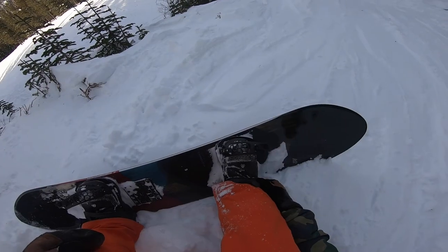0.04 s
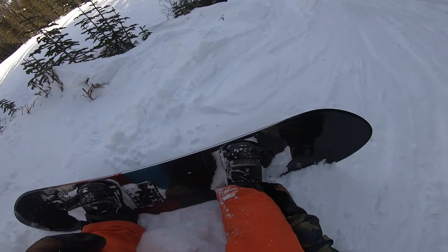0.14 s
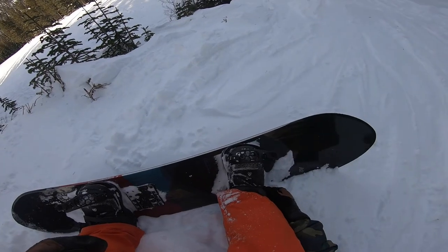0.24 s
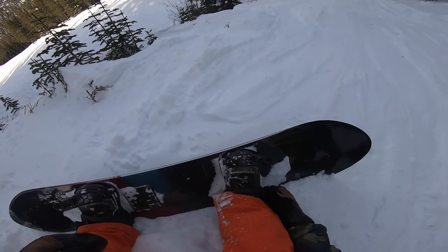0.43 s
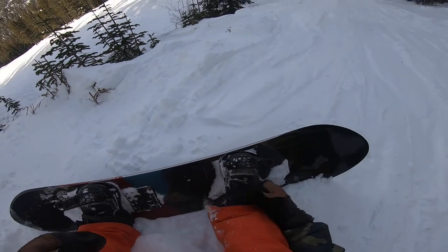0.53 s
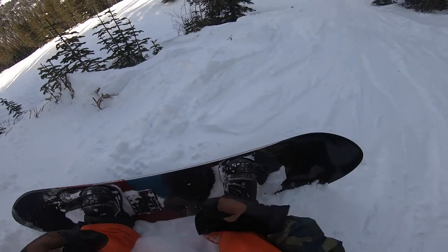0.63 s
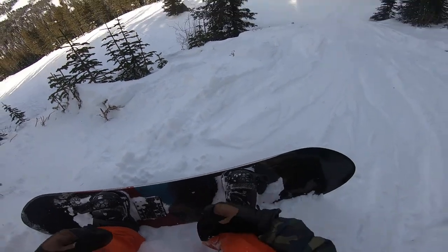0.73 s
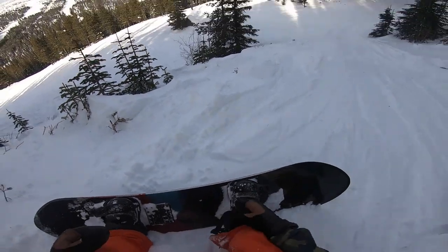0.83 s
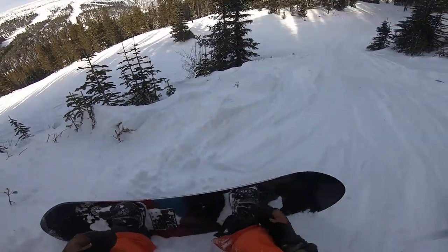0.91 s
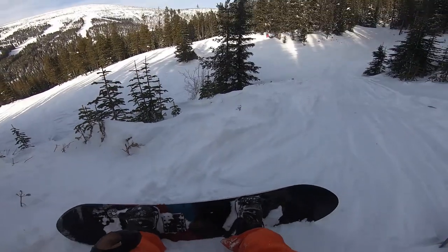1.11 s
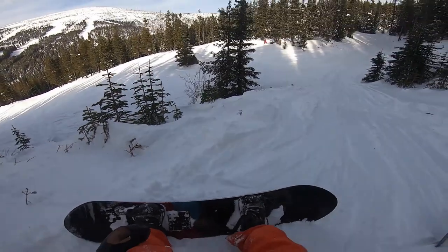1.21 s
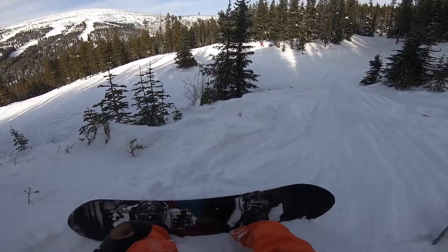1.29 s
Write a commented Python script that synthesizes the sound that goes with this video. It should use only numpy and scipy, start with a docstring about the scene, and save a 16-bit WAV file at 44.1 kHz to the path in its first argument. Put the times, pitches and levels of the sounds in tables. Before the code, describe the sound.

A snowboard binding buckle knocks and ratchets tight, with a jacket rustling close by.

```python
"""On open snow, a body-worn camera's microphone an arm's length from a snowboard binding. The seated rider
tightens it: the buckle knocks home, the pawl snaps along the ladder strap and loose parts tick. Right at the
microphone a padded jacket rubs and bumps, its zip creaks as it sticks and slips, a nylon sleeve swishes and air
puffs lightly. A light hiss of clothing and snow swells and lulls to the right; there is no echo."""
import sys
import numpy as np
from scipy.fft import rfft, irfft, next_fast_len
from scipy.io import wavfile
from scipy.ndimage import map_coordinates

SR = 44100
rng = np.random.default_rng(int(sys.argv[2]) if len(sys.argv) > 2 else 0)


def dump_mix(stems):
    """Bounce the given channels to the path in sys.argv[1] as a 16-bit WAV at rate SR."""
    frames = np.atleast_2d(stems).T  # one column per channel
    limited = np.clip(frames, -1, 1)  # hard clip at full scale
    pcm = np.round(limited * 32767).astype(np.int16)
    wavfile.write(sys.argv[1], SR, pcm)


N = 59535
SIDE = np.array([[.5], [-.5]])  # splits a left-minus-right amount between the channels


def amp(db):
    """Decibels to gain."""
    return 10 ** (np.asarray(db) / 20)


def along(points, hz):
    """Read (Hz, value) points on a log frequency axis."""
    freqs, values = np.transpose(points)
    return np.interp(np.log(hz + 1), np.log(freqs + 1), values)


def curve(points):
    """Join (seconds, value) points into one value per sample."""
    return np.interp(np.arange(N) / SR, *np.transpose(points))


def wobble(rate):
    """A smooth random curve, rate knots a second."""
    return map_coordinates(rng.standard_normal(4096), [np.arange(N) * rate / SR], mode="wrap")


def filtered(x, response):
    """Filter x by a complex response of frequency."""
    size = next_fast_len(N + SR // 2)
    return irfft(rfft(x, size) * response(np.fft.rfftfreq(size, 1 / SR)), size)[..., :N]


# Sound close to the microphone. Each row: frequency in Hz, left-right correlation.
NEAR_LIKENESS = [(300, 0.99), (1200, 0.76), (3500, 1), (6000, 0.39), (8000, 0.2)]
def noise(colour, likeness=NEAR_LIKENESS):
    """Coloured stereo noise of rms 1, with the given left-right likeness."""
    def mid_and_side(hz):
        angle = np.arccos(np.clip(along(likeness, hz), -1, 1)) / 2
        return amp(along(colour, hz)) * np.array([np.cos(angle), np.sin(angle)])
    mid, side = filtered(rng.standard_normal((2, N)), mid_and_side)
    stereo = np.array([mid + side, mid - side])
    return stereo / np.sqrt(np.mean(stereo ** 2) + 1e-20)


def since(start):
    """Seconds since a moment, zero before it."""
    return np.maximum(np.arange(N) / SR - start, 0)


def burst(start, rise, t60):
    """Envelope of one contact: a quick rise, then a decay."""
    t = since(start)
    return np.minimum(t / rise, 1) ** 2 * amp(-60 * np.maximum(t - rise, 0) / t60)


def ring(start, modes, scatter_db, detune):
    """Struck, damped modes of alternating sign; level and pitch vary from blow to blow."""
    t, out = since(start), np.zeros(N)
    live = (t > 0) & (t < .15)
    for k, (hz, db, t60) in enumerate(modes):
        level_draw, pitch_draw = rng.standard_normal(2)
        cycles = hz * (1 + detune * pitch_draw) * t[live]
        swell = 1 - np.exp(-cycles / 0.91)
        decay = amp(db + scatter_db * level_draw - 60 * t[live] / t60)
        out[live] += (-1) ** k * swell * decay * np.sin(2 * np.pi * cycles)
    return out


# The buckle hits home. Each row: start in seconds, boom level in dB, crack level in dB.
BUCKLE_KNOCKS = [(0.2737, -4, -25), (0.2754, -27, -22)]
# Boot, binding and board. Each row: frequency in Hz, level in dB, 60 dB decay time in seconds.
BINDING_MODES = [(85, -9.5, 0.09), (183.6, -7.5, 0.079), (300.3, -0.5, 0.052), (413, -17, 0.03),
                 (510, -3.5, 0.016), (723, -16, 0.033), (1110, -12, 0.031), (1665, -14, 0.023),
                 (2310, -4.5, 0.0038), (3060, -6, 0.0064)]
# The snap of buckle and teeth. Each row: frequency in Hz, relative level in dB.
SNAP_COLOUR = [(180, -22), (400, -0.5), (730, -4.5), (1000, -3.5), (1900, -8), (2800, -3.5), (4800, -10),
               (5400, -18), (7000, -8.5), (9300, -19.5), (10500, -42), (15000, -36)]
def buckle_knock():
    """An arm's length away, the buckle cracks against the binding, which booms with the board."""
    boom = sum(amp(db) * ring(s, BINDING_MODES, scatter_db=0.8, detune=0.004)
               for s, db, _ in BUCKLE_KNOCKS)
    crack = sum(amp(db) * burst(s, rise=0.000097, t60=0.02) for s, _, db in BUCKLE_KNOCKS)
    return boom + crack * noise(SNAP_COLOUR)


# Ladder teeth passing the pawl. Each row: start in seconds, relative level in dB.
LADDER_TEETH = [(0.3134, -17), (0.3199, -17.5), (0.3402, -21.5), (0.357, -24), (.377, -23), (0.3896, -19.5),
                (0.3938, -15.5), (0.4022, -17), (.412, -19), (0.4254, -14.5), (0.4328, -9), (0.4405, -11.5),
                (0.4486, -11), (.4548, -15), (0.4606, -14), (.4678, -11), (.4727, -11.5), (0.477, -19.5)]
# Pawl and taut strap. Each row: frequency in Hz, level in dB, 60 dB decay time in seconds.
PAWL_MODES = [(5420, -1, 0.011), (6330, 0, 0.0079)]
STRAP_MODES = [(140, 4, 0.056), (252.6, 0.5, 0.052), (395, -13, 0.026), (740.5, -6, 0.06)]
def ratchet():
    """Each tooth snaps under the pawl, rings it and plucks the strap."""
    rise_s = 0.001713
    pawl_growth = 2.18  # hard snaps ring the pawl far more than light ones
    snaps = sum(amp(db - 8) * burst(s, rise_s, t60=0.011) for s, db in LADDER_TEETH)
    pawl = sum(amp(pawl_growth * db + 1) * ring(s + rise_s / 2, PAWL_MODES, scatter_db=-2.5, detune=.016)
               for s, db in LADDER_TEETH)
    thuds = sum(amp(db - 12) * ring(s + rise_s, STRAP_MODES, scatter_db=1, detune=0.046)
                for s, db in LADDER_TEETH)
    return snaps * noise(SNAP_COLOUR) + pawl + thuds


# Loose buckle parts. Each row: start in seconds, relative level in dB, clack offset in dB.
PART_TICKS = [(.2751, -13, -14), (.8145, -21, 12), (.8278, -28, -14), (.8422, -34, -12), (.853, -36, -2),
              (.858, -34, -14), (.916, -16.5, -12), (.9245, -21.5, -2), (1.0555, -38, 18)]
# Their metal. Each row: frequency in Hz, level in dB, 60 dB decay time in seconds.
METAL_MODES = [(1680, -4, 0.0067), (2600, -2, 0.0065), (5760, 0, 0.006), (6700, 0, 0.005),
               (7690, 5, 0.0055), (12100, -25, 0.007)]
# The plastic they hit. Each row: frequency in Hz, relative level in dB.
PLASTIC_COLOUR = [(150, -2), (500, 3.5), (900, 5), (1900, -3), (3600, -3.5), (7500, -10), (11000, -28),
                  (16000, -55)]
def buckle_ticks():
    """Right of the microphone, small metal parts ring briefly and clack on plastic."""
    metal = sum(amp(db - 6.5) * ring(s + 0.000447, METAL_MODES, scatter_db=1, detune=0.013)
                for s, db, _ in PART_TICKS)
    clack = sum(amp(db + clack_db - 12.5) * burst(s, rise=0.00094, t60=0.0096)
                for s, db, clack_db in PART_TICKS)
    return (metal + clack * noise(PLASTIC_COLOUR)) * amp([[-2.5], [1.5]])


# Zip creaks. Each row: start and length in seconds, first and last slip rate in Hz, level in dB.
ZIP_CREAKS = [(0.127, 0.034, 195.4, 166, -36), (.2, 0.069, 333.5, 289, -34.5),
              (0.477, 0.0444, 216.7, 226.5, -29.5), (0.517, 0.033, 242, 356, -32.5),
              (.799, .018, 487, 503, -33)]
def zip_creak():
    """A zip rubbing in the cloth sticks and slips at a gliding, unsteady rate."""
    jitter, octave_fall_db, fade_s = 0.047, -12, 0.011
    out = np.zeros(N)
    for start, length, first_hz, last_hz, db in ZIP_CREAKS:
        t = since(start)
        slip_hz = np.interp(t, [0, length], [first_hz, last_hz]) * (1 + jitter * wobble(250))
        phase = 2 * np.pi * np.cumsum(slip_hz * (t > 0)) / SR
        tone = sum(amp(octave_fall_db * np.log2(k)) * np.sin(k * phase) for k in range(1, 6))
        fade = np.clip(np.minimum(t, length - t) / fade_s, 0, 1)
        out += np.sqrt(2) * tone * amp(db + 0.45 * wobble(200)) * fade
    return out


# Cloth rubbing. Each row: time in seconds, level in dB.
RUB_LEVELS = [(0, -53.5), (.18, -53), (.225, -33.5), (.3, -32.5), (.38, -44), (.45, -30), (.5, -35.5),
              (.555, -44), (.69, -56), (.76, -48), (.92, -48), (.97, -42.5), (1.025, -52), (1.1, -47.5),
              (1.21, -37), (1.255, -43.5), (1.3, -38)]
# Soft bumps. Each row: start in seconds, relative level in dB, scuff offset in dB.
JACKET_BUMPS = [(0.248, -15.5, -15), (0.315, -15.5, -23), (.333, -19, -23), (.362, -24.5, -17),
                (0.814, -29.5, -1), (0.851, -43, 7.5), (.883, -43.5, 12), (0.94, -22, -35),
                (.957, -16, -39), (0.98, -30, 3.5), (1.0545, -41, 8), (1.087, -30.5, -8), (1.194, -26, 0.5),
                (1.285, -31, -2), (1.303, -22.5, -13), (1.344, -27, -4)]
# Camera mount and padding. Each row: frequency in Hz, level in dB, 60 dB decay time in seconds.
PADDING_MODES = [(102, -6.5, 0.11), (195, 4.5, 0.058), (308.6, -2.5, 0.048), (447, -5, 0.048)]
# Dull cloth friction. Each row: frequency in Hz, relative level in dB.
RUB_COLOUR = [(25, -36), (70, -13.5), (130, 1.5), (200, 1.5), (330, 0), (550, -7), (1200, -22), (2500, -25),
              (6000, -38), (12000, -78)]
SCUFF_COLOUR = [(150, -2), (500, 8.5), (1200, -3.5), (2500, -17.5), (6000, -61), (15000, -67)]
def jacket():
    """Right at the microphone, padded cloth rubs and bumps the camera, each bump with a scuff."""
    rub = amp(curve(RUB_LEVELS) + 2 * wobble(90.14)) * noise(RUB_COLOUR)
    bumps = sum(amp(db - 3.5) * ring(s, PADDING_MODES, scatter_db=0.8, detune=0.05)
                for s, db, _ in JACKET_BUMPS)
    scuffs = sum(amp(db + scuff_db - 1) * burst(s, rise=0.002, t60=0.03)
                 for s, db, scuff_db in JACKET_BUMPS)
    return rub + bumps + scuffs * noise(SCUFF_COLOUR)


# The sliding sleeve. Each row: time in seconds, level in dB.
SWISH_LEVELS = [(.18, -63.5), (.24, -55), (.308, -57), (.326, -40.5), (.37, -54), (.41, -40), (.47, -34.5),
                (.5, -36), (.565, -38.5), (.61, -39), (.675, -45.5), (.712, -63), (.78, -42.5), (.825, -45),
                (.89, -58.5), (1.02, -75), (1.33, -51)]
# Light skims. Each row: middle and half width in seconds, level in dB.
NYLON_SKIMS = [(0.636, 0.052, -45), (1.055, 0.012, -50), (1.09, 0.014, -49.5)]
# Bright nylon friction. Each row: frequency in Hz, relative level in dB.
SWISH_COLOUR = [(180, -36), (500, -7.5), (900, -9), (1100, -1), (1800, -7), (2400, -1.5), (4800, -8.5),
                (7300, -7), (9300, -17), (10500, -32.5), (15000, -28.5)]
SKIM_COLOUR = [(1000, -28), (5500, -8), (7700, 1), (10200, -19), (15000, -31)]
def sleeve():
    """Close by, nylon slides with a fine, uneven grain and hisses brightly where it skims."""
    grain = amp(1.4 * wobble(600) + 0.8 * wobble(45.1))
    swish = amp(curve(SWISH_LEVELS)) * noise(SWISH_COLOUR)
    skims = sum(amp(db) * np.exp(-((since(0) - s) / width) ** 2) for s, width, db in NYLON_SKIMS)
    return grain * (swish + skims * noise(SKIM_COLOUR))


# The hiss of clothing and snow. Each row: time in seconds, level in dB.
HISS_LEVELS = [(0, -51), (.17, -50), (.68, -53), (.714, -55), (.76, -52.5), (.92, -43), (.975, -48),
               (1.06, -46)]
# Its width. Each row: frequency in Hz, left-right correlation.
HISS_LIKENESS = [(200, 0.5), (1500, 0.53), (7000, 0.17), (12000, 0.15)]
# Air on the microphone. Each row: start in seconds, level in dB, 60 dB decay time in seconds.
MIC_PUFFS = [(0.278, -45, 0.45), (.33, -40, 0.22), (.45, -40.5, 0.61), (.8, -42.5, 0.34),
             (0.873, -45, 0.15)]
# The hiss and the low buffeting. Each row: frequency in Hz, relative level in dB.
HISS_COLOUR = [(59, -16), (130, 5), (250, -3.5), (850, 3), (1700, 1), (5500, -14.5), (7400, -4),
               (9600, -21), (15000, -51)]
BUFFET_COLOUR = [(25, -5.5), (70, -9.5), (110, -33), (1500, -75)]
def hiss_and_puffs():
    """A light hiss of clothing and snow swells and lulls to the right; air puffs on the microphone."""
    hiss_pan_db, puff_pan_db, left_lag_s, floor_db = -8, -4, 0.000305, -61
    hiss = noise(HISS_COLOUR, HISS_LIKENESS)
    hiss = filtered(hiss, lambda hz: np.exp(-2j * np.pi * hz * left_lag_s * SIDE))
    hiss *= amp(curve(HISS_LEVELS) + hiss_pan_db * SIDE)
    puffs = amp(floor_db) + sum(amp(db) * burst(s, rise=0.01, t60=t60) for s, db, t60 in MIC_PUFFS)
    buffet = noise(BUFFET_COLOUR, likeness=[(30, 0.18), (90, 0.56)])
    return hiss + puffs * amp(puff_pan_db * SIDE) * buffet


# The gear's balance at the microphone. Each row: frequency in Hz, left minus right in dB.
GEAR_PAN = [(200, 0.5), (500, -2), (1200, -6), (2500, -4.5), (5500, -1), (8000, -7), (12000, -2)]
# Its phase there. Each row: frequency in Hz, lead of the left channel in radians.
GEAR_PHASE = [(500, 0), (1200, 0.87), (3500, -0.52), (6500, 0.9), (8500, 1.26)]
def scene():
    """The gear lies close by, slightly to the right, over a light hiss, with no echo from the snow."""
    def placement(hz):
        return amp(SIDE * along(GEAR_PAN, hz)) * np.exp(1j * SIDE * along(GEAR_PHASE, hz))
    gear = buckle_knock() + ratchet() + buckle_ticks() + zip_creak() + jacket() + sleeve()
    return filtered(gear, placement) + hiss_and_puffs()


def record(dry):
    """The camera's microphone dips near 10 kHz, lifts near 12 kHz and ends at its band limit."""
    treble = [(8500, 1), (10500, -2.5), (12200, 3.5), (15000, -11)]  # frequency in Hz, gain in dB
    top_hz = 15800
    return filtered(dry, lambda hz: amp(along(treble, hz)) * (hz < top_hz))


dry = scene()
out = record(dry)
dump_mix(out)
```